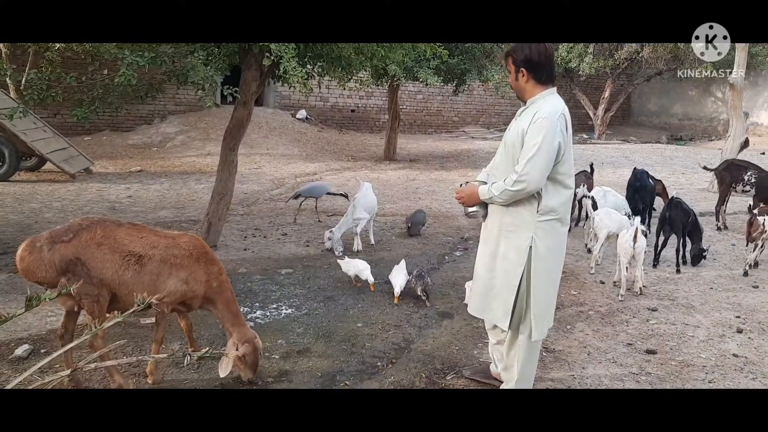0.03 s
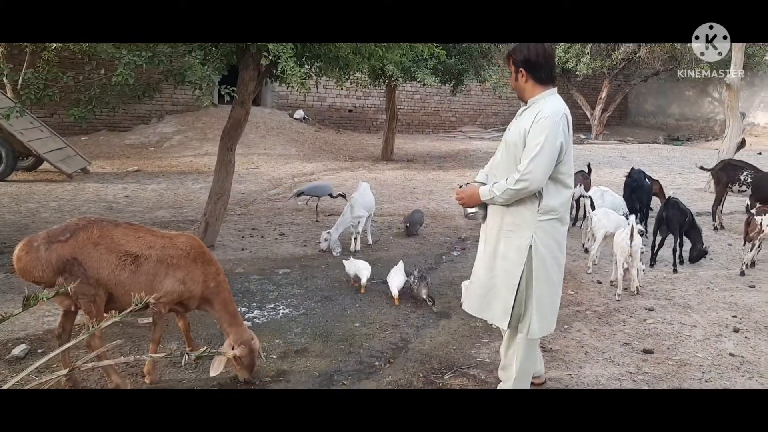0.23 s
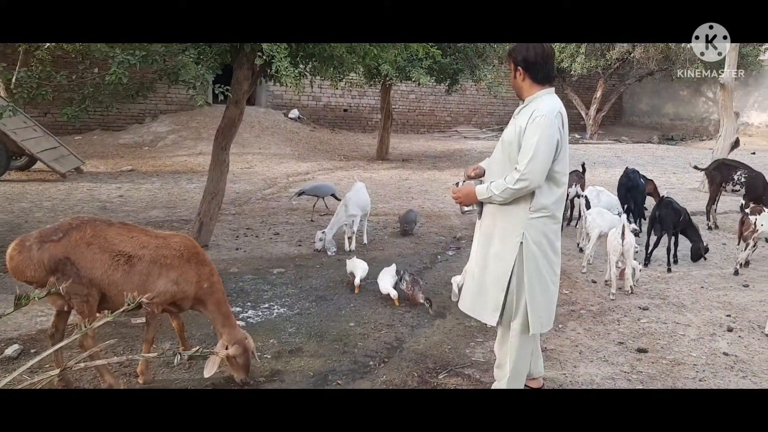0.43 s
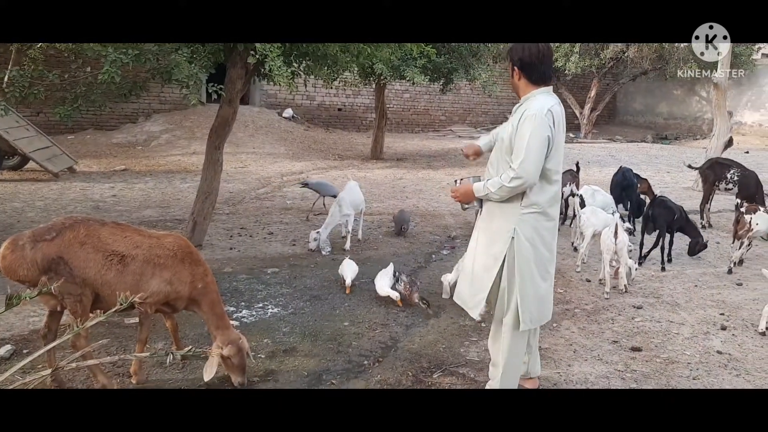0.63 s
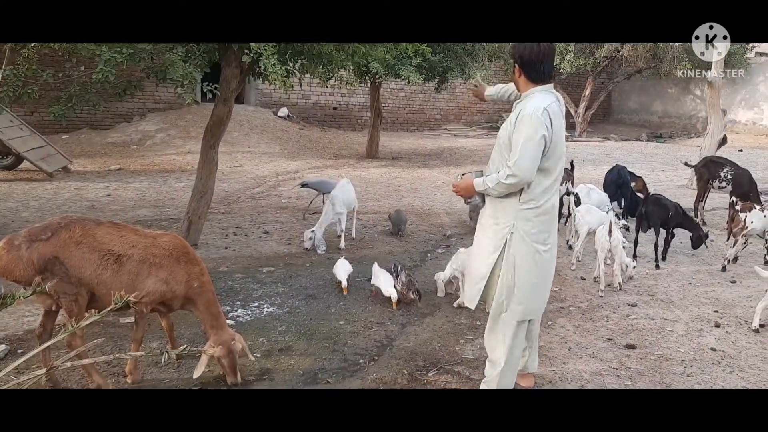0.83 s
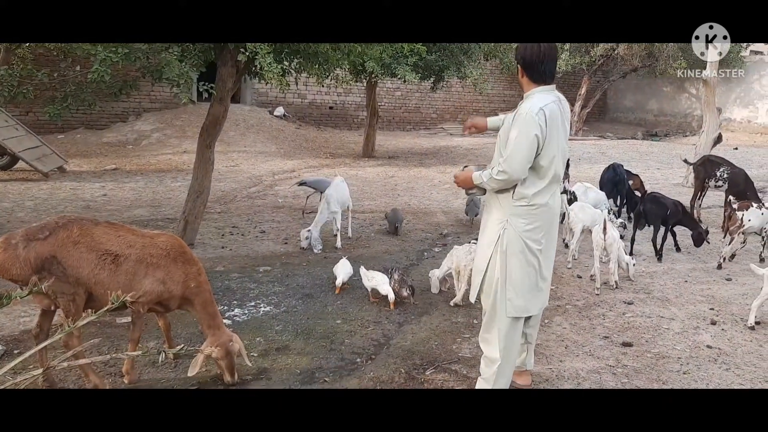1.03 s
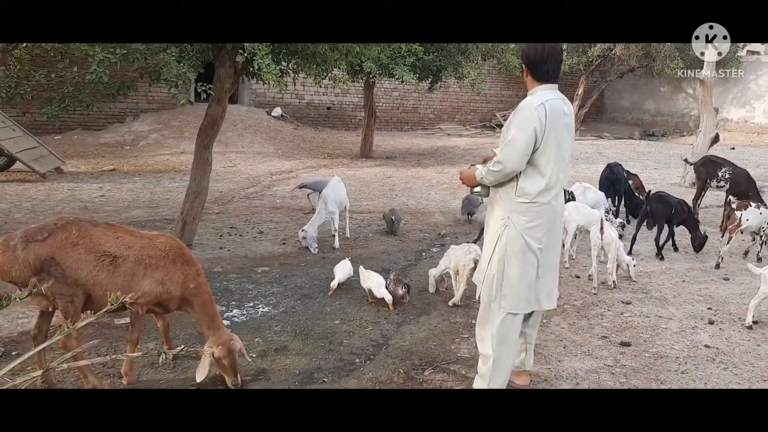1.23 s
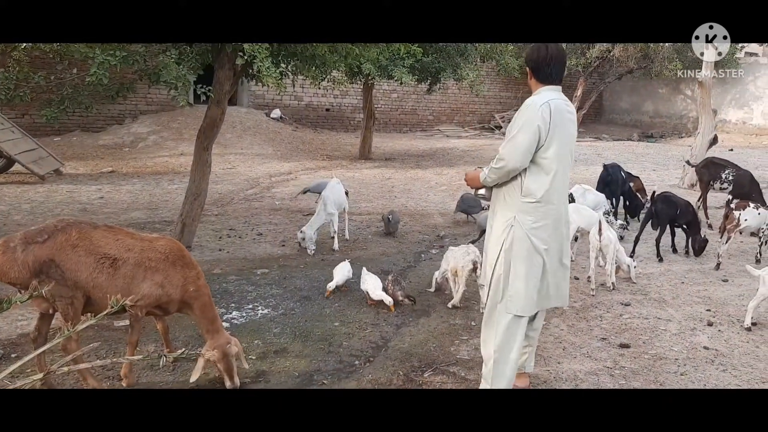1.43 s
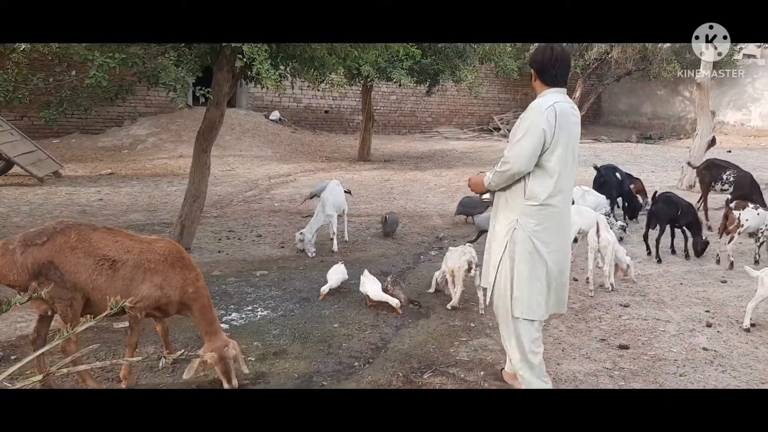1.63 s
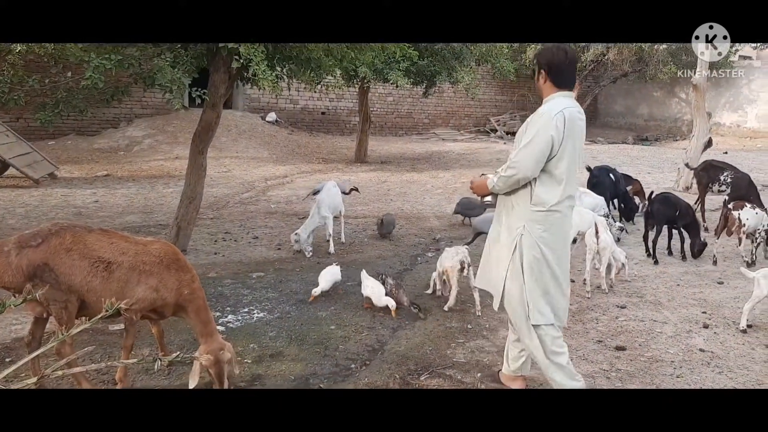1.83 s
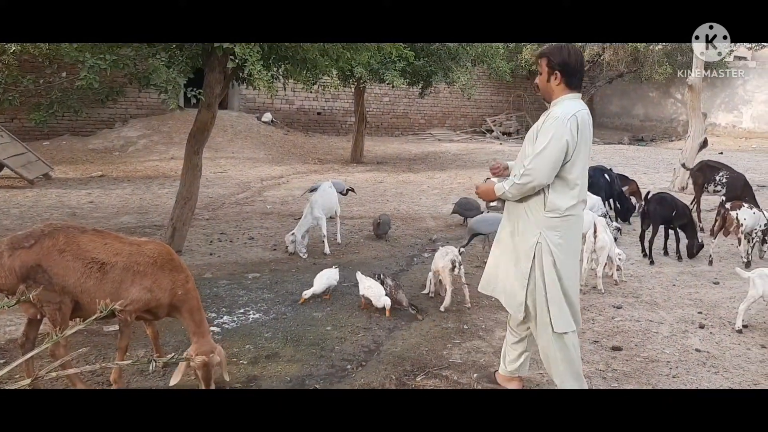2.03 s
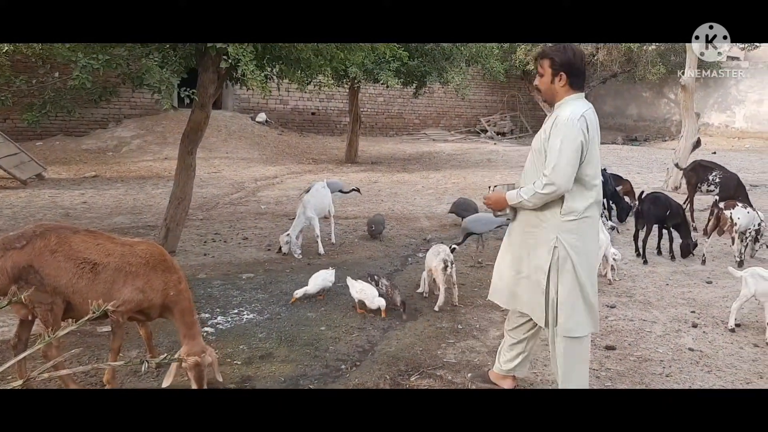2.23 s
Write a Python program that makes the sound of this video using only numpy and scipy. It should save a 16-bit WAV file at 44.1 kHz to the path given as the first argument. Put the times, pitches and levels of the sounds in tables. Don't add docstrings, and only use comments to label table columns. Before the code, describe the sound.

Hoarse, throaty bird caws, early and late, over brief duck quacks, light hoof knocks and dry shuffling.

```python
import sys
import numpy as np
from scipy import signal
from scipy.fft import rfft, irfft
from scipy.io import wavfile
from scipy.ndimage import uniform_filter1d

SR = 44100
rng = np.random.default_rng(int(sys.argv[2]) if len(sys.argv) > 2 else 0)


def to_wav(sig):
    pcm = np.clip(np.atleast_2d(sig), -1, 1) * 32767
    pcm = np.round(pcm).astype(np.int16)
    wavfile.write(sys.argv[1], SR, pcm.T)


def convert_level_to_amplitude(level_db):
    exponent = np.asarray(level_db, float) / 20
    return 10 ** exponent


N = 99225

CAW_STARTS_S = [.16, 1.69]
CAW_PACE = [1, 1.07]
WARBLE_HZ = [73.5, 75]
# seconds after the start, pitch in Hz, warble as share of pitch, hoarse jitter as share of pitch.
CAW_SHAPE = [(0, 380, .03, .05), (.045, 430, .05, .025), (.075, 474, .075, .006), (.12, 492, .082, .002),
             (.16, 497, .082, .002), (.2, 482, .075, .003), (.24, 454, .045, .012), (.27, 443, .028, .02),
             (.288, 430, .025, .03), (.31, 360, .03, .08), (.335, 330, .03, .14)]
# time in seconds, level in dB, breath in dB, beak ring in dB, mouth narrowing in dB.
CAW_EFFORT = [
    [(.16, -54.5, 6, -18, -8.5), (.19, -44, -12, -17, 1.5), (.255, -30.5, -12, -14, -0.5),
     (.31, -32, -13.5, -13.5, 0.5), (.375, -31, -18, -16.5, 2.5), (.415, -27.5, -21.5, -26, 4),
     (.45, -31.5, -15.5, -33, 0), (.495, -61, -6, -23, 7.2)],
    [(1.692, -54.5, -3, -8, -5), (1.73, -42.5, -9.5, -11, 0), (1.77, -31, -16.5, -11.5, 5),
     (1.87, -32.5, -12.5, -16, 1), (1.89, -31.5, -11.5, 4.5, 7), (1.925, -28.5, -14.5, -12, 2.5),
     (1.96, -33.5, -13, -11.5, 0.5), (2.0, -47.5, -6, -16, 3)],
]
# centre in Hz, width in Hz, level in dB.
CAW_THROAT = [(1105, 408, 3.5), (1330, 420, 5), (1458, 900, 0.5), (2032, 360, 0.5), (2280, 590, -18)]
MOUTH_SHARE = [-.6, 0.6, 0.1, -.8, -.2]
# centre in Hz, width in Hz, level in dB.
BEAK = [(3530, 253, -4.5), (4430, 94, -9), (5160, 137, -17), (6900, 540, -8)]
# frequency in Hz, level in dB.
BREATH = [(1500, 2.5), (2850, 10.5), (3600, 11), (8000, 8), (9800, 1.5), (13000, 9), (16000, -2.5)]
# start in seconds, length in seconds, level in dB, first Hz, last Hz.
SQUEAKS = [
    (.163, 0.039, -45, 1268, 996),
    (0.178, 0.064, -45.5, 2174, 2300),
    (1.693, 0.056, -47.5, 1086, 1053),
    (1.697, 0.071, -44.5, 2394, 1877),
]
# start in seconds, length in seconds, level in dB, first and last pulse rate in Hz.
QUACKS = [
    (0.406, 0.065, -40.5, 325.3, 268.4),
    (0.838, 0.037, -38.5, 298.3, 225),
    (1.543, 0.03, -47, 196, 188.6),
    (1.612, 0.034, -37.5, 334, 220.3),
]
QUACK_OPEN_DB = [-1.5, -0.5, -6.5, -2]
# centre in Hz, width in Hz, level in dB.
QUACK_THROAT = [(300, 280, -1.5), (520, 220, -9), (1200, 620, -1), (2350, 480, -7)]
# start in seconds, length in seconds, level in dB, first Hz, last Hz.
WHISTLES = [(0.606, 0.02, -50, 1073, 1063), (0.82, .024, -42.5, 970, 960),
            (0.831, 0.015, -42.5, 1330, 1260), (0.874, 0.027, -53, 990, 900),
            (1.34, 0.0404, -48.5, 1150, 1425), (1.385, 0.021, -47.5, 1400, 1330),
            (1.402, 0.0239, -45.5, 1332, 863), (1.592, .02, -36.5, 1151, 1051),
            (1.603, 0.02, -36.5, 1070, 1033), (1.598, 0.027, -48, 2140, 2150),
            (1.603, 0.016, -48, 1550, 1440)]
# time in seconds, peak in dB, pitch in Hz.
KNOCKS = [(0.358, -42, 358), (0.781, -50, 334), (.875, -36.5, 304), (0.97, -38, 327), (1.085, -34, 314),
          (1.112, -39, 357), (1.144, -46, 330), (1.276, -46, 400), (1.405, -26.5, 339), (1.425, -48, 375),
          (1.466, -41, 398), (1.482, -40.5, 341), (1.648, -38.5, 243), (1.701, -53, 310), (1.949, -45, 304),
          (1.98, -45, 550), (0.461, -41.5, 378)]
# time in seconds, peak in dB, pitch in Hz.
TICKS = [(0.099, -40, 1405), (0.656, -38, 2580), (.668, -52.5, 1087), (.782, -49, 1160),
         (0.8757, -31, 1306), (0.95, -59, 2160), (1.037, -70, 2410), (1.103, -44, 1300),
         (1.114, -43.5, 1400), (1.153, -45.5, 1020), (1.302, -42, 1280), (1.439, -38, 1370),
         (1.461, -46, 1290), (1.471, -36, 2520), (1.473, -39.5, 1490), (1.472, -46, 940),
         (1.4965, -41, 2180), (1.497, -41.5, 1320), (1.5491, -42.5, 1200), (1.698, -38, 2100),
         (1.346, -44, 1240), (1.641, -47, 1270), (2, -38, 2450), (2.027, -62, 985), (2.05, -40, 1145),
         (2.05, -54, 2150), (2.1, -47, 2120), (2.197, -45, 1400), (2.215, -58.5, 1370)]
# time in seconds, peak in dB, centre in Hz.
SNAPS = [(0.6444, -50, 6190), (0.6969, -48.5, 4100), (0.7523, -59, 9800), (0.811, -54, 9600),
         (0.9282, -60, 4120), (1.1432, -58, 6900), (1.228, -59, 11700), (1.327, -55.5, 4220),
         (1.346, -54, 4250), (1.3515, -44, 4030), (1.356, -69.5, 6000), (1.362, -50, 4000),
         (1.4725, -44, 4600), (1.4736, -54.5, 7350), (1.4717, -65, 12800), (.264, -44, 13000),
         (1.652, -60, 4400), (2.086, -49, 13600), (2.236, -56, 14100)]
# time in seconds, level in dB.
PATTER_DB = [(0, -67), (.5, -86), (.75, -77), (.9, -60.5), (1.2, -63), (1.6, -58.5), (2.25, -69.5)]
# centre in Hz, width in Hz, level in dB.
PATTER_BODY = [(330, 150, 0), (1250, 500, -15), (2300, 700, -17)]
# start in seconds, rise in seconds, time to fall 60 dB in seconds, level in dB.
SHUFFLES = [(0, 0.0029, 2.8, -55), (.43, 0.032, 1.17, -48.5), (.61, 0.026, 0.69, -52),
            (.75, 0.0083, 0.45, -58.5), (.8, 0.036, 0.65, -51.5), (1.225, 0.0051, 1.1, -61.5),
            (1.33, 0.043, 1.6, -59.5), (1.466, 0.002, 0.43, -49), (1.599, 0.028, 1.4, -54),
            (1.95, 0.043, 2.1, -51), (2.058, 0.051, 0.6, -48)]
# frequency in Hz, level in dB.
LEAVES = [(1500, 2), (2500, 9.5), (4500, 4), (7000, 3.5), (9800, -1), (13000, 5), (16000, 0.5)]
# frequency in Hz, level in dB per Hz.
YARD = [(22, -19), (70, -3.5), (110, -0.5), (230, -19), (700, -19.5), (2200, -16), (8000, -36.5),
        (15800, -34)]

THROB, THROB_TURN_RAD, BREATH_THROB = .25, -1.57, .25
CAW_RASP, FUNDAMENTAL_DB, BREATH_ALIKE = .07, -30.5, .18
SQUEAK_JITTER = .08
QUACK_JITTER, QUACK_ATTACK_S, QUACK_RELEASE_S, QUACK_SAG_DB = .03, .008, .004, -6
WHISTLE_EDGE_S, OVERTONE_DB = .005, -22
KNOCK_T60_S, KNOCK_PUSH_S, KNOCK_BEND, KNOCK_BEND_S = .045, .004, .32, .0019
TICK_T60_S, SNAP_T60_S, SNAP_WIDTH = .015, .025, .4
PATTER_PER_S, PATTER_SPREAD_DB = 300, 2
LEAF_PER_S, LEAF_SPREAD_DB, LEAF_HUSH = 2500, 1, .2
YARD_DB, ALIKE_BELOW_HZ, ALIKE = -58, 900, .9
ECHO_DB, ECHO_T60_S, ECHO_GAP_S, ECHO_TOP_HZ = -13, .36, .0022, 4340
DUCK_ECHO_SHARE = .6
CAW_PAN_DB, DUCK_PAN_DB, NEAR_PAN_DB, LEAF_PAN_DB = -.5, 2, 1, 1.5
CAW_LAG_S, DUCK_LAG_S, NEAR_LAG_S = -.00012, -.00012, -.0001
DIP_HZ, DIP_WIDTH_HZ, DIP_SHARE, TOP_HZ = 2820, 300, .65, 15830


def unit(x):
    return x / np.sqrt(np.mean(x ** 2) + 1e-20)


def band(x, hz, width):
    sharpness = max(hz / width, .3)
    return signal.lfilter(*signal.iirpeak(min(hz, .45 * SR), sharpness, fs=SR), x)


def body(x, peaks):
    out = 0
    for k, (hz, width, db) in enumerate(peaks):
        out = out + (-1) ** k * convert_level_to_amplitude(db) * band(band(x, hz, width), hz, width)
    return out


def colour(x, points):
    hz, db = np.array(points).T
    f = np.maximum(np.arange(N // 2 + 1) * SR / N, 1)
    gain = convert_level_to_amplitude(np.interp(np.log(f), np.log(hz), db))
    return unit(irfft(rfft(x) * gain, N))


def walk(rate):
    k = int(SR / rate)
    held = np.repeat(rng.standard_normal(N // k + 1), k)
    return 1.287 * uniform_filter1d(uniform_filter1d(held, k), k)[:N]


def gate(t, start, length, rise, fall):
    ramp = np.minimum((t - start) / rise, (start + length - t) / fall)
    return np.sin(np.pi / 2 * np.clip(ramp, 0, 1)) ** 2


def fade(t, start, t60):
    return (t >= start) * convert_level_to_amplitude(-60 * np.maximum(t - start, 0) / t60)


def glide(t, start, length, hz0, hz1, jitter=0, rate=400):
    hz = np.interp(t, [start, start + length], [hz0, hz1])
    return np.cumsum(hz * (1 + jitter * walk(rate))) / SR


def sparks(per_s, spread_db):
    hit = rng.random(N) < per_s / SR
    sign = np.sign(rng.standard_normal(N))
    size = rng.exponential(size=N)
    return hit * sign * convert_level_to_amplitude(spread_db * np.minimum(size, 4))


def ports(x, lag_s, pan_db):
    turn = np.exp(-2j * np.pi * np.arange(N // 2 + 1) * SR / N * lag_s)
    left = irfft(rfft(x) * turn, N)
    return np.array([left * convert_level_to_amplitude(pan_db / 2), x * convert_level_to_amplitude(-pan_db / 2)])


def apart(mid, other):
    f = np.arange(N // 2 + 1) * SR / N
    alike = ALIKE / (1 + (f / ALIKE_BELOW_HZ) ** 2)
    a = rfft(mid) * np.sqrt((1 + alike) / 2)
    b = rfft(other) * np.sqrt((1 - alike) / 2)
    return np.array([irfft(a + b, N), irfft(a - b, N)])


def caws(t):
    voice, breath, shape = 0, 0, np.array(CAW_SHAPE)
    for start, pace, warble_hz, rows in zip(CAW_STARTS_S, CAW_PACE, WARBLE_HZ, CAW_EFFORT):
        s, db, breath_db, beak_db, mouth_db = np.array(rows).T
        slow = 2 * np.pi * np.cumsum(warble_hz * (1 + .015 * walk(30))) / SR
        shake = np.sin(slow) + .4 * np.sin(2 * slow)
        throb = 1 + THROB * np.sin(slow + THROB_TURN_RAD)

        place = (t - start) * pace
        pitch, warble, hoarse = (np.interp(place, shape[:, 0], column) for column in shape[:, 1:].T)
        hz = pitch * (1 + warble * shake + hoarse * walk(300))
        phase = 2 * np.pi * np.cumsum(hz) / SR
        harmonics = sum(np.cos(k * phase + k * k) for k in range(2, 13))
        source = harmonics * throb * (1 + CAW_RASP * walk(900))

        size = gate(t, s[0], s[-1] - s[0], .025, .025) * convert_level_to_amplitude(np.interp(t, s, db))
        narrow = np.interp(t, s, mouth_db)
        throat = 0
        for k, (share, peak) in enumerate(zip(MOUTH_SHARE, CAW_THROAT)):
            throat = throat + (-1) ** k * convert_level_to_amplitude(share * narrow) * body(source, [peak])
        fundamental = convert_level_to_amplitude(FUNDAMENTAL_DB) * np.cos(phase)
        beak = convert_level_to_amplitude(np.interp(t, s, beak_db)) * unit(body(source, BEAK))
        voice = voice + size * (unit(throat) + fundamental + beak)
        breath = breath + size * convert_level_to_amplitude(np.interp(t, s, breath_db)) * throb ** BREATH_THROB
    return voice, breath


def squeaks(t, wobble):
    out = 0
    for s, length, db, hz0, hz1 in SQUEAKS:
        tone = np.sin(2 * np.pi * glide(t, s, length, hz0, hz1, SQUEAK_JITTER))
        on = gate(t, s, length, 2 * WHISTLE_EDGE_S, 2 * WHISTLE_EDGE_S)
        out = out + convert_level_to_amplitude(db) * tone * on * wobble ** 2
    return out


def quacks(t):
    out = 0
    for (s, length, db, hz0, hz1), open_db in zip(QUACKS, QUACK_OPEN_DB):
        upper = [(hz, width, peak_db + open_db) for hz, width, peak_db in QUACK_THROAT[1:]]
        throat = QUACK_THROAT[:1] + upper
        turns = glide(t, s, length, hz0, hz1, QUACK_JITTER, 250)
        turns = turns - np.interp(s + length - QUACK_RELEASE_S, t, turns)
        count = np.floor(turns)
        pulses = np.diff(count, prepend=count[0]) * convert_level_to_amplitude(1.8 * walk(300))
        steady_rms = np.sqrt(np.mean(body(pulses, throat) ** 2))
        on = gate(t, s, length, QUACK_ATTACK_S, QUACK_RELEASE_S) ** .5
        sag = convert_level_to_amplitude(QUACK_SAG_DB * np.clip((t - s) / length, 0, 1))
        out = out + convert_level_to_amplitude(db) / steady_rms * body(pulses * on * sag, throat)
    return out


def whistles(t, wobble):
    out = 0
    for s, length, db, hz0, hz1 in WHISTLES:
        phase = 2 * np.pi * glide(t, s, length, hz0, hz1)
        tone = np.sin(phase) + convert_level_to_amplitude(OVERTONE_DB) * (np.sin(2 * phase) + np.sin(3 * phase))
        out = out + convert_level_to_amplitude(db) * tone * gate(t, s, length, 2 * WHISTLE_EDGE_S, WHISTLE_EDGE_S) * wobble
    return out


def knocks(t):
    out, wobble = 0, convert_level_to_amplitude(walk(150))
    for s, db, hz in KNOCKS:
        push = np.clip((t - s) / KNOCK_PUSH_S, 0, 1)
        bend = KNOCK_BEND * KNOCK_BEND_S * (1 - np.exp(-np.maximum(t - s, 0) / KNOCK_BEND_S))
        ring = np.sin(2 * np.pi * hz * (t - s + bend))
        out = out + convert_level_to_amplitude(db) * fade(t, s, KNOCK_T60_S) * push * ring * wobble
    return out


def ticks(t):
    out = 0
    for s, db, hz in TICKS:
        ring = np.sin(2 * np.pi * hz * (t - s)) + .44 * np.sin(2 * np.pi * 1.9 * hz * (t - s))
        out = out + convert_level_to_amplitude(db) * fade(t, s, TICK_T60_S) * ring
    return out


def snaps(t):
    out, noise = 0, rng.standard_normal(N)
    for s, db, hz in SNAPS:
        burst = unit(band(noise, hz, SNAP_WIDTH * hz))
        out = out + convert_level_to_amplitude(db + 3.5) * fade(t, s, SNAP_T60_S) * burst
    return out


def patter(t):
    size = convert_level_to_amplitude(np.interp(t, *np.array(PATTER_DB).T))
    return size * unit(body(sparks(PATTER_PER_S, PATTER_SPREAD_DB), PATTER_BODY))


def leaf_grain():
    clicks = unit(sparks(LEAF_PER_S, LEAF_SPREAD_DB))
    return colour(clicks + LEAF_HUSH * rng.standard_normal(N), LEAVES)


def shuffles(t):
    power = 0
    for s, rise, t60, db in SHUFFLES:
        swell = np.clip((t - s) / rise, 0, 1)
        dying = convert_level_to_amplitude(-60 * np.maximum(t - s - rise, 0) / t60)
        power = power + (convert_level_to_amplitude(db) * swell * dying) ** 2
    size = np.sqrt(power) * convert_level_to_amplitude(1.35 * walk(31.78))
    return size * np.array([leaf_grain() * convert_level_to_amplitude(LEAF_PAN_DB / 2), leaf_grain() * convert_level_to_amplitude(-LEAF_PAN_DB / 2)])


def yard():
    mid = colour(rng.standard_normal(N), YARD)
    other = colour(rng.standard_normal(N), YARD)
    air = apart(mid, other)
    octaves = 30 * 2. ** np.arange(10)
    return convert_level_to_amplitude(YARD_DB) * unit(sum(convert_level_to_amplitude(walk(6)) * band(air, hz, hz) for hz in octaves))


def echo(x):
    t = np.arange(N) / SR
    tail = apart(rng.standard_normal(N), rng.standard_normal(N))
    tail = tail * (t > ECHO_GAP_S) * convert_level_to_amplitude(-60 * t / ECHO_T60_S)
    tail = signal.lfilter(*signal.butter(1, ECHO_TOP_HZ, fs=SR), tail)
    tail = tail / np.sqrt(np.sum(tail ** 2) / 2)
    return convert_level_to_amplitude(ECHO_DB) * signal.fftconvolve(x[None], tail, axes=1)[:, :N]


def scene():
    t = np.arange(N) / SR
    voice, breath = caws(t)
    wobble = convert_level_to_amplitude(walk(200))
    duck = quacks(t) + whistles(t, wobble) + squeaks(t, wobble)
    near = knocks(t) + ticks(t) + snaps(t) + patter(t)

    puffs = np.array([colour(rng.standard_normal(N), BREATH) for _ in range(3)])
    shared = np.sqrt(BREATH_ALIKE) * ports(puffs[0], CAW_LAG_S, CAW_PAN_DB)
    hiss = breath * (shared + np.sqrt(1 - BREATH_ALIKE) * puffs[1:])

    direct = ports(voice, CAW_LAG_S, CAW_PAN_DB)
    direct = direct + ports(duck, DUCK_LAG_S, DUCK_PAN_DB)
    direct = direct + ports(near, NEAR_LAG_S, NEAR_PAN_DB)
    returned = echo(voice + DUCK_ECHO_SHARE * (duck + near) + hiss[0])
    return direct + hiss + returned + shuffles(t) + yard()


def band_limit(x):
    return signal.sosfilt(signal.butter(12, 15800, fs=SR, output="sos"), x)


def record(dry):
    dipped = dry - DIP_SHARE * band(dry, DIP_HZ, DIP_WIDTH_HZ)
    top = signal.ellip(10, .2, 60, TOP_HZ, fs=SR, output="sos")
    mix = signal.sosfilt(top, dipped)
    return band_limit(mix)


dry = scene()
out = record(dry)
to_wav(out)
```